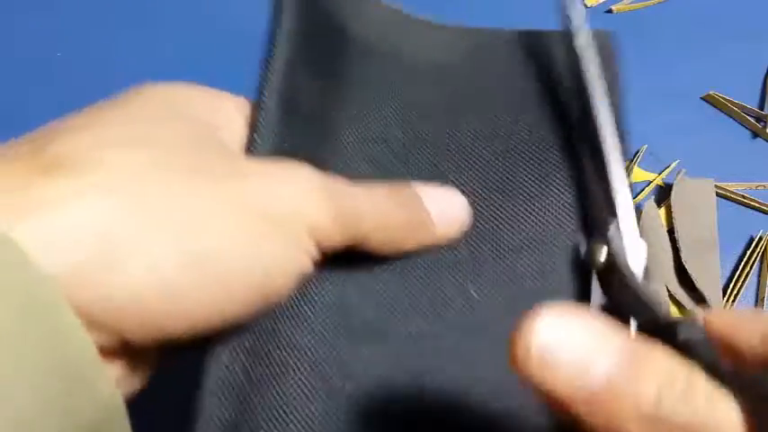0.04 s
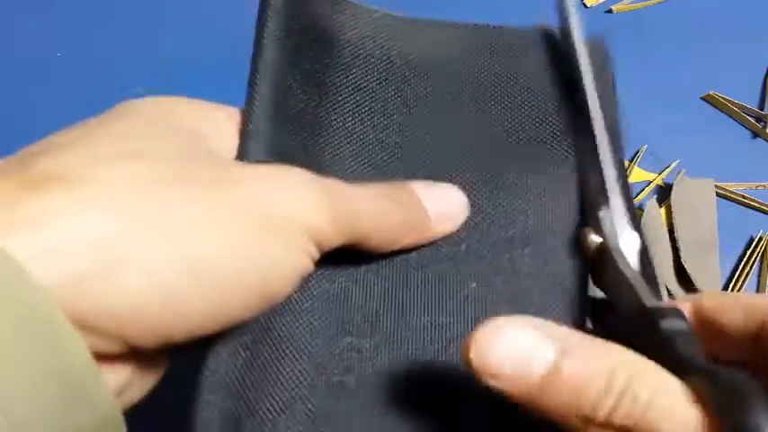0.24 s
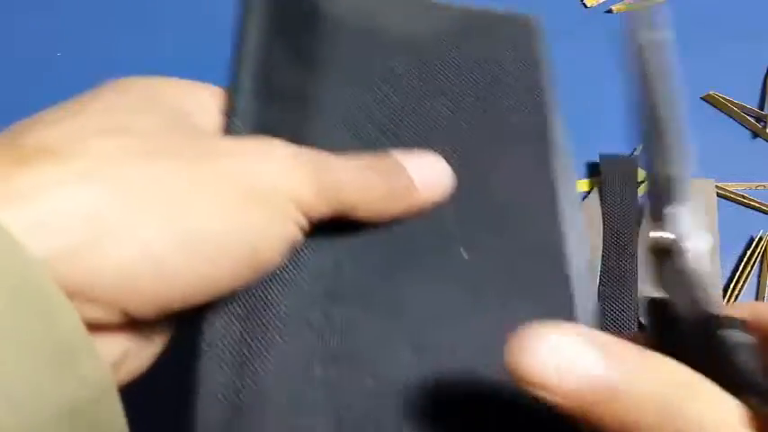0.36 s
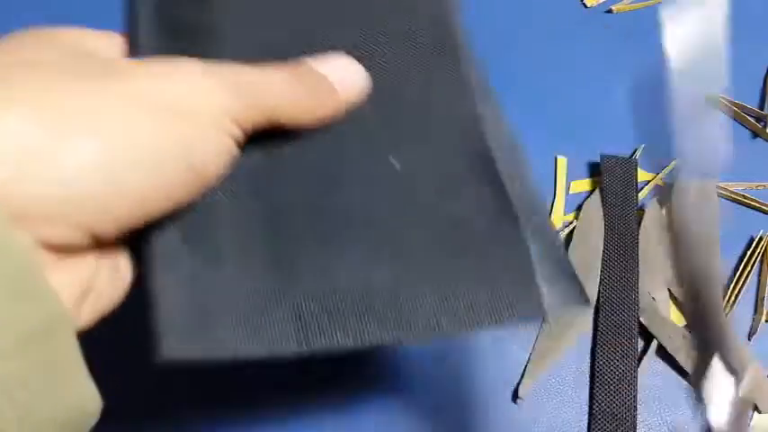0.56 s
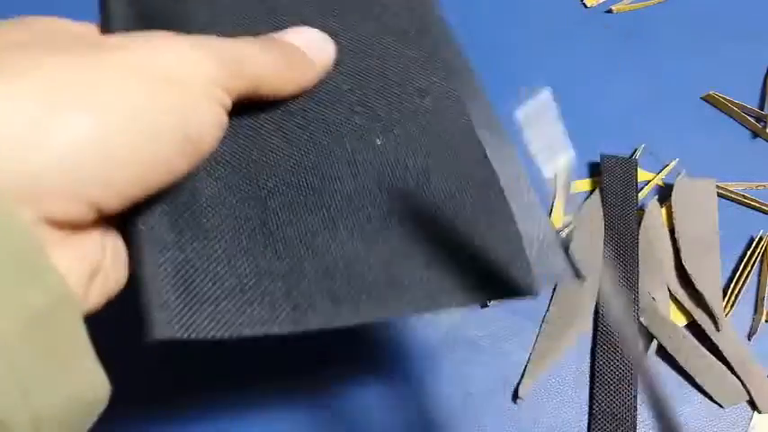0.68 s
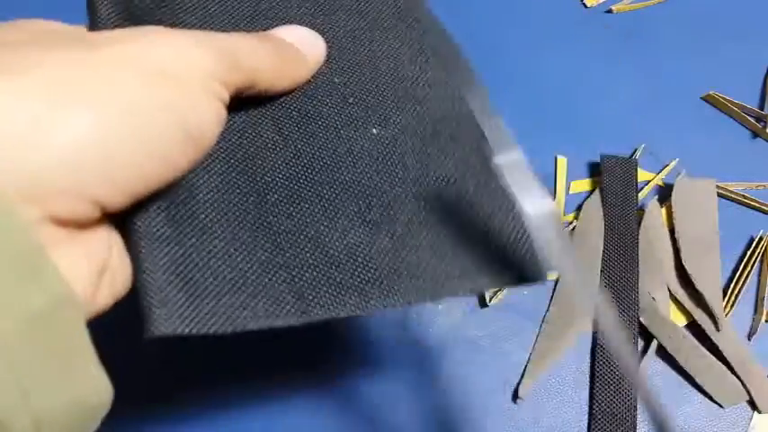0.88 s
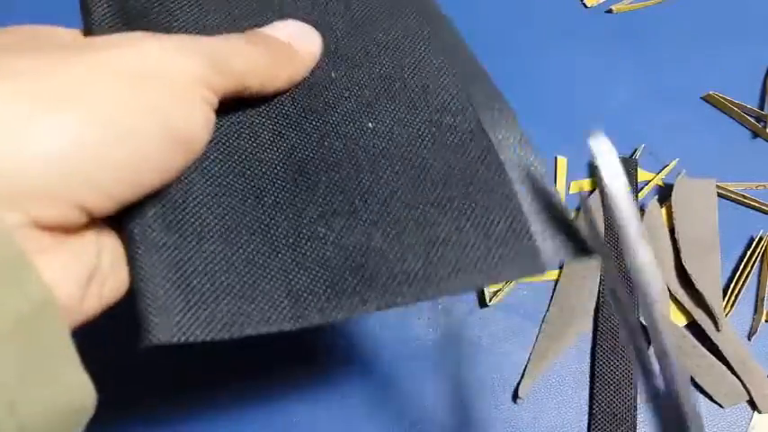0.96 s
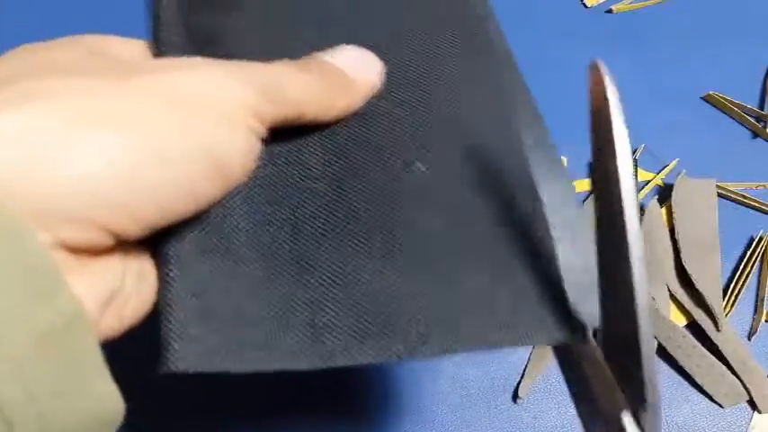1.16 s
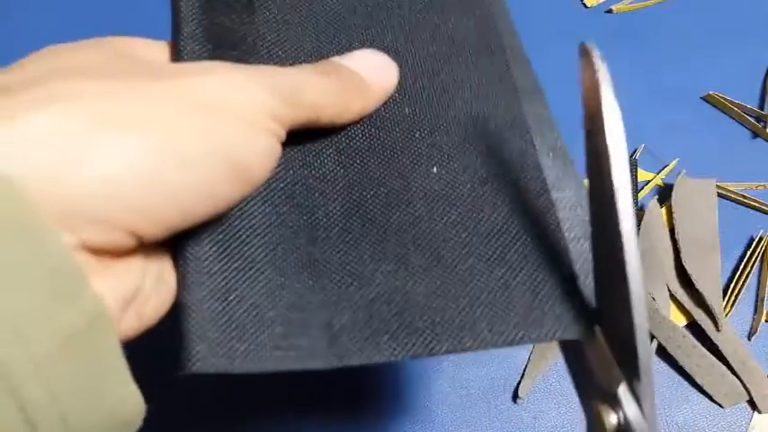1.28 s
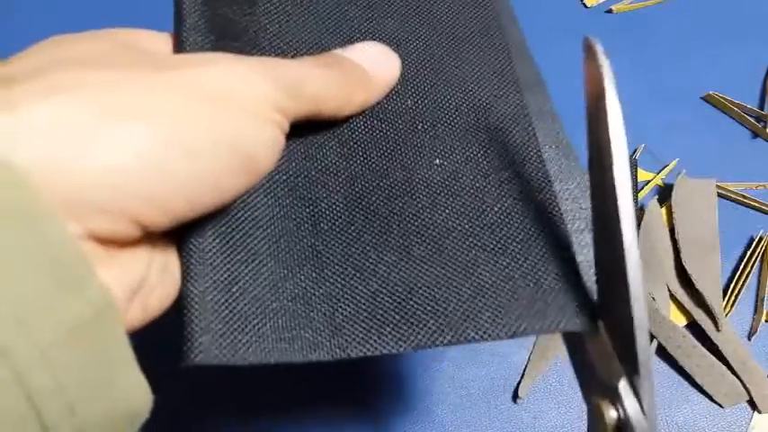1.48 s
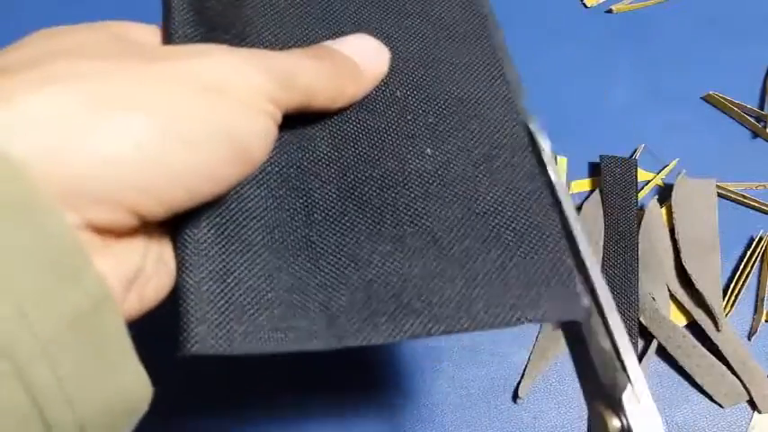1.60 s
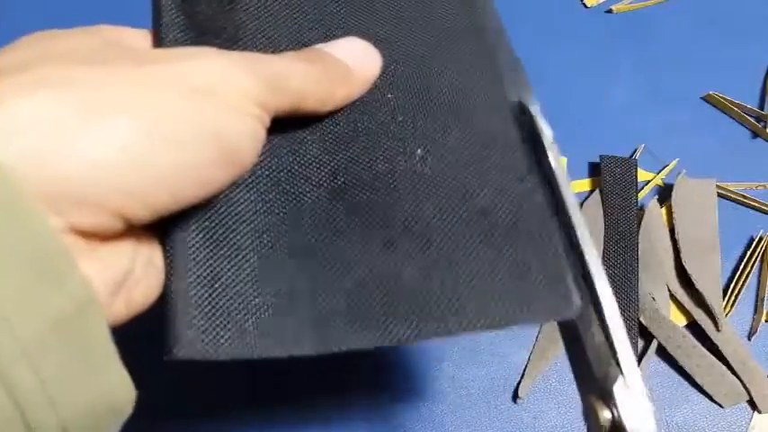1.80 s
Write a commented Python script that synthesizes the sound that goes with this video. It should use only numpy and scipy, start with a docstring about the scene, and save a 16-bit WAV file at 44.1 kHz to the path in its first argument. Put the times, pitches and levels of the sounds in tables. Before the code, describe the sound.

Scissors cut thick fabric twice, with crunchy snips, a steel clack and soft cloth rustles.

```python
"""Tailor's scissors cut thick woven fabric twice, close up and a little to the right, in a small quiet room.
The cloth rustles, then threads snap in a dense crunch and the blades shut with a steel clack.
The blades slide open and tick lightly while the cloth is shifted over the table.
In the second cut the pressed edges scrape and squeal upward until the thick last threads part.
The blades slide again and the sheet is let go with a soft flap."""
import sys
import numpy as np
from scipy import signal
from scipy.fft import rfft, irfft
from scipy.io import wavfile

SR = 44100
rng = np.random.default_rng(int(sys.argv[2]) if len(sys.argv) > 2 else 0)


def generate_wav(signal):
    """Clip the signal to [-1, 1] and save it as 16-bit WAV at the path in sys.argv[1]."""
    frames = np.transpose(np.atleast_2d(signal))
    scaled = np.clip(frames, -1, 1) * 32767
    pcm = np.round(scaled).astype(np.int16)
    wavfile.write(sys.argv[1], SR, pcm)


N = 81585


def amp(db):
    """Decibels to gain."""
    return 10 ** (np.asarray(db) / 20)


def unit(x):
    """Scales to rms 1."""
    return x / np.sqrt(np.mean(x ** 2) + 1e-20)


def clock():
    """Sample times in s."""
    return np.arange(N) / SR


def per_bin(points):
    """Interpolates a table onto the FFT bins, in log frequency."""
    f, value = np.transpose(points)
    return np.interp(np.log(np.fft.rfftfreq(N, 1 / SR) + 1), np.log(f + 1), value)


def colour(x, spectrum):
    """Filters x by a spectrum; rms 1."""
    return unit(irfft(rfft(x) * amp(per_bin(spectrum)), N))


def wobble(hz):
    """Noise low-passed at hz; rms 1."""
    rolloff = 1 + (np.fft.rfftfreq(N, 1 / SR) / hz) ** 4
    return unit(irfft(rfft(rng.standard_normal(N)) / rolloff, N))


def pan(db):
    """Stereo gains for a left minus right (L-R) level."""
    return amp(db * np.array([[.5], [-.5]]))


def stereo_noise(width=.48):
    """White noise, partly shared by left and right."""
    mid, side = rng.standard_normal((2, N))
    return np.array([mid + width * side, mid - width * side])


def grains(per_s, spread_db):
    """Stereo train of tiny clicks, a few of them large."""
    size = amp(spread_db * np.minimum(rng.exponential(1, N), 4))
    return size * (rng.random(N) < per_s / SR) * stereo_noise()


def stroke(at, db, rise, fall, round_s=.005):
    """Envelope that swells to a rounded peak and dies away."""
    t = clock() - at
    return amp(db - np.where(t < 0, rise, fall) * (np.hypot(t, round_s) - round_s))


def bursts(rows, spectrum):
    """Sudden bursts of coloured noise with exponential decay."""
    t = clock()
    level = sum(amp(db) * np.exp(-np.maximum(t - at, 0) / decay) * (t >= at) for at, db, decay in rows)
    return level * colour(stereo_noise(), spectrum)


def convolve(x, response):
    """Stereo convolution, scaled to unit energy in the left response."""
    return signal.fftconvolve(x, response / np.linalg.norm(response[0]), axes=1)[:, :N]


def blade_smear(x, t60_s=.022, ring_db=-5):
    """The many close modes of the blades smear each click."""
    t = clock()[:SR // 10]
    ring = rng.standard_normal((2, len(t))) * amp(-60 * t / t60_s)
    return x + amp(ring_db) * convolve(x, ring)


# Room floor and hand rumble spectra: f/Hz, level/dB
FLOOR_SPECTRUM = [(20, -9.5), (60, -14), (105, -0.5), (170, -12), (300, -15), (600, -17), (1500, -25),
                  (4000, -26), (7000, -19.5), (10700, -46.5)]
RUMBLE_SPECTRUM = [(20, -3), (70, -6), (103, 3), (160, -6.5), (250, -9), (450, -14), (1200, -44)]
# Hand rumble envelope: t/s, level/dB
HANDLING = [(0, -68), (.13, -90.5), (.3, -62.5), (.47, -72), (.75, -66.5), (.98, -63), (1.22, -63.5),
            (1.35, -76.5), (1.64, -58), (1.85, -76)]


def background(floor_db=-68.5):
    """Room floor and the rumble of moving hands."""
    floor = amp(floor_db) * colour(stereo_noise(), FLOOR_SPECTRUM)
    rumble_db = np.interp(clock(), *np.transpose(HANDLING))
    return floor + amp(rumble_db) * colour(stereo_noise(), RUMBLE_SPECTRUM)


# Cloth drags and sheet flaps: peak t/s, level/dB, rise/(dB/s), fall/(dB/s)
RUSTLES = [(.008, -44, 200, 305), (0.046, -47.5, 280, 574), (0.167, -63, 603, 492),
           (.33, -51.5, 911, 400.5), (0.701, -63.5, 57.5, 54), (0.967, -54, 415, 114),
           (1.02, -58.5, 190, 77.5), (1.231, -54, 493.5, 404), (1.666, -60, 316, 167)]
FLAPS = [(0.044, -58.5, 198, 600), (0.163, -62.5, 700, 503), (1.232, -61.5, 500, 500),
         (1.835, -64.5, 498.5, 200)]
# Their spectra: f/Hz, level/dB
RUSTLE_SPECTRUM = [(40, -15), (200, -14.5), (700, -0.5), (1500, -7), (2600, 2), (4000, -0.5), (6500, 3),
                   (8500, -6), (10700, -16.5)]
FLAP_SPECTRUM = [(40, -16.5), (110, 0.5), (260, -1), (450, -4.5), (750, 0), (1500, -7), (3000, -20.5),
                 (8000, -41)]


def cloth():
    """The weave rasps on fingers and steel; the sheet flaps when lifted and let go."""
    rub = grains(per_s=7000, spread_db=2.6) * amp(2.9 * wobble(91))
    rasp = colour(rub, RUSTLE_SPECTRUM) * np.sqrt(sum(stroke(*row) ** 2 for row in RUSTLES))
    flap = colour(grains(per_s=5400, spread_db=1.5), FLAP_SPECTRUM)
    return rasp + flap * sum(stroke(*row) for row in FLAPS)


# Snap envelopes, one list per cut: t/s, relative crisp level/dB, relative crunch level/dB
CUTS = [
    [(.176, -54.5, -59.5), (.182, -41.5, -51.5), (.192, -34, -41), (.199, -29, -32.5), (.211, -32, -39),
     (.217, -47.5, -57.5), (.224, -32, -45.5), (.228, -31, -51.5)],
    [(1.455, -53, -66.5), (1.467, -41.5, -52.5), (1.49, -38, -46.5), (1.514, -31.5, -40),
     (1.534, -31.5, -38), (1.552, -29, -35), (1.56, -28, -33.5), (1.572, -28, -35), (1.583, -26, -32.5),
     (1.588, -35.5, -41)],
]
# Treble and body spectra of snapping threads: f/Hz, level/dB
CRISP_SPECTRUM = [(500, -41), (1800, -25.5), (2800, -4.5), (4300, -1.5), (5200, 1), (6300, 4), (7600, 2.5),
                  (8600, -8), (10700, -4)]
CRUNCH_SPECTRUM = [(30, -28), (110, -9.5), (250, -9), (415, -5.5), (540, -5.5), (700, 0), (1050, -2),
                   (1280, -7), (1750, -6.5), (2600, -3), (6000, -41.5)]


def cutting(threads_per_s=580, clump_db=2.2, attack_db_per_s=6000, release_db_per_s=899):
    """Fibres snap in clumps as the edges pass thread after thread."""
    t, out = clock(), np.zeros((2, N))
    for cut in CUTS:
        times, crisp_db, crunch_db = np.transpose(cut)
        fade_db = attack_db_per_s * np.maximum(times[0] - t, 0)
        fade_db += release_db_per_s * np.maximum(t - times[-1], 0)
        threads_passed = np.cumsum(threads_per_s * (1 + .25 * wobble(150))) / SR
        clumps = amp(clump_db * np.cos(2 * np.pi * threads_passed))
        snaps = blade_smear(grains(per_s=14000, spread_db=1.8) * clumps)
        out += colour(snaps, CRISP_SPECTRUM) * amp(3.5 + np.interp(t, times, crisp_db) - fade_db)
        out += colour(snaps, CRUNCH_SPECTRUM) * amp(.5 + np.interp(t, times, crunch_db) - fade_db)
    return out


# Blade impact and bounces: t/s, level/dB, L-R/dB
CONTACTS = [(.2311, 1, -5), (0.2315, -5.5, -14), (0.2336, -11.5, -5), (0.237, -19.5, -5.5)]
# Blade modes: f/Hz, relative level/dB, t60/s
BLADE_MODES = [(7250, 0, .005), (6400, -14, .012), (4400, -18, .016), (2850, -17, .006), (1400, -15, .004),
               (850, -19, .005), (10600, -21, .009), (3548, -48, .12), (4328, -45, .14), (6455, -41, .2),
               (7020, -40, .16), (8027, -43, .15)]


def clack(crack_decay_s=.00089, crack_db=-7, detune=.0028):
    """The blades slam shut and bounce; each contact cracks and rings their modes."""
    out = np.zeros((2, N))
    for at, db, pan_db in CONTACTS:
        start = round(at * SR)
        t = clock()[:N - start]
        ring = np.zeros(len(t))
        for hz, mode_db, t60 in BLADE_MODES:
            hz *= 1 + detune * rng.standard_normal()
            ring += amp(mode_db - 60 * t / t60) * np.sin(2 * np.pi * hz * t)
        crack = stereo_noise()[:, :len(t)] * np.exp(-t / crack_decay_s)
        out[:, start:] += amp(db) * pan(pan_db) * (ring + amp(crack_db) * crack)
    return out


# Spectrum of ringing or sliding steel: f/Hz, level/dB
STEEL_SPECTRUM = [(400, -32.5), (1700, -21), (2900, -12), (3700, -12), (4400, -12.5), (5100, -9),
                  (6400, -1), (7400, -4), (8600, -11), (10700, -15)]


def shimmer(db=-27.5, t60_s=.17):
    """Many weak blade modes ring on after the clack."""
    return bursts([(CONTACTS[0][0], db, t60_s / np.log(1000))], STEEL_SPECTRUM)


def puff(at_s=.2313, decay_s=.0015, left_gain=.05):
    """A quick pull and slower push of air as the blades shut."""
    u = np.maximum(clock() - at_s, 0) / decay_s
    pressure = -2 * u * (1 - u + u ** 2 / 6) * np.exp(-u)
    return pressure * np.array([[left_gain], [1]])


# Low thuds: t/s, f/Hz, level/dB, t60/s, L-R/dB
THUDS = [(0.2314, 301.7, -16.5, 0.0098, -14.5), (0.2324, 130, -37, .07, -9.5), (0.327, 111, -41.5, 0.11, 0),
         (1.504, 107, -46.5, 0.15, -11)]


def thuds():
    """Damped low thuds: the thump of the blades shutting, then softer handling bumps."""
    out = np.zeros((2, N))
    for at, hz, db, t60, pan_db in THUDS:
        t = np.maximum(clock() - at, 0)
        out += pan(pan_db) * amp(db - 60 * t / t60) * np.sin(2 * np.pi * hz * t)
    return out


# Blade strokes: peak t/s, level/dB, rise/(dB/s), fall/(dB/s), relative body level/dB
SLIDES = [(.252, -32, 900, 288, -20.5), (0.429, -40, 531, 263, -20.5), (.605, -52, 152, 197, -19),
          (0.819, -58, 403, 121, -13), (1.2, -47, 204, 292, -15), (1.59, -35.5, 1500, 400, -13),
          (1.802, -32, 701, 385, -17)]


def sliding():
    """Fine friction of blade on blade, with some body from the cloth between them."""
    rub = blade_smear(grains(per_s=15000, spread_db=3) * amp(1.5 * wobble(200)))
    hiss = sum(stroke(at, db, rise, fall) for at, db, rise, fall, _ in SLIDES)
    body = sum(stroke(at, db + body_db, rise, fall) for at, db, rise, fall, body_db in SLIDES)
    return hiss * colour(rub, STEEL_SPECTRUM) + body * colour(rub, CRUNCH_SPECTRUM)


# Ticks: t/s, level/dB, decay/s
TICKS = [(.327, -43.5, 0.0039), (.7235, -52.5, 0.00092), (.884, -44, 0.00087), (1.025, -46.5, 0.0015),
         (1.1992, -26.5, 0.0032), (1.665, -50, .0012)]
# Tick spectrum: f/Hz, level/dB
TICK_SPECTRUM = [(300, -14.5), (2000, -18.5), (4700, -10.5), (5600, 0), (7000, -4), (8000, -2),
                 (9800, -7.5), (10700, -4)]


def ticks():
    """Light contacts of pivot and edges."""
    return bursts(TICKS, TICK_SPECTRUM)


# Low glides: t/s, length/s, start f/Hz, end f/Hz, level/dB
LOW_TONES = [(0.655, 0.098, 331, 237, -66), (0.781, 0.178, 267.7, 188, -65),
             (1.584, 0.11, 216.2, 229.6, -58.5)]


def low_tones(jitter=.0423):
    """Faint wavering glides while the cloth is moved."""
    out = np.zeros(N)
    for at, length, start_hz, end_hz, db in LOW_TONES:
        progress = np.clip((clock() - at) / length, 0, 1)
        hz = (start_hz + (end_hz - start_hz) * progress) * (1 + jitter * wobble(61))
        out += amp(db) * np.sin(np.pi * progress) * np.sin(2 * np.pi * np.cumsum(hz) / SR)
    return out


# Edge resonance, second cut: t/s, centre f/Hz, level/dB
SCRAPE = [(1.455, 5400, -51), (1.5, 6200, -38.5), (1.526, 7600, -33.5), (1.552, 8300, -29),
          (1.561, 7000, -42.5), (1.574, 6000, -23), (1.587, 5800, -44.5)]


def scrape(half_band_hz=980, width=.48):
    """Friction noise in a broad resonance that moves with the blades' crossing point."""
    t = clock()
    times, hz, db = np.transpose(SCRAPE)
    level = amp(np.interp(t, times, db)) * (t > times[0]) * (t < times[-1])
    phase = 2 * np.pi * np.cumsum(np.interp(t, times, hz)) / SR
    mid, side = (wobble(half_band_hz) * np.cos(phase) + wobble(half_band_hz) * np.sin(phase)
                 for _ in range(2))
    return level * unit(np.array([mid + width * side, mid - width * side]))


# Edge squeal, second cut: t/s, f/Hz, level/dB
SQUEAL = [(1.464, 5600, -59.5), (1.467, 5650, -34), (1.479, 5850, -45), (1.484, 5950, -36),
          (1.501, 6300, -34.5), (1.508, 6650, -26.5), (1.513, 7150, -19.5), (1.517, 7500, -35),
          (1.521, 7790, -24.5), (1.532, 7950, -32), (1.545, 8220, -44)]


def squeal(jitter=.02, flutter_db=2, low_mode_hz=3040, low_mode_db=-13.5):
    """Stick-slip climbs in pitch as the crossing nears the tips; hard pressure adds a lower mode."""
    t = clock()
    times, hz, db = np.transpose(SQUEAL)
    level = amp(np.interp(t, times, db)) * (t > times[0]) * (t < times[-1])
    turns = np.cumsum(np.interp(t, times, hz) * (1 + jitter * wobble(790))) / SR
    tone = unit(np.sin(2 * np.pi * turns) * amp(flutter_db * wobble(476)))
    low_mode = unit(np.sin(2 * np.pi * low_mode_hz * t + wobble(446)))
    return level * (tone + amp(low_mode_db) * low_mode * level / level.max())


# Final snaps: t/s, level/dB, decay/s
LAST_THREADS = [(1.5735, -20.5, 0.0011), (1.5806, -11.5, 0.00065), (1.5854, -19, 0.00041)]


def last_threads(body_db=-9.5):
    """Thick threads part one by one at the end of the second cut."""
    return bursts(LAST_THREADS, CRISP_SPECTRUM) + amp(body_db) * bursts(LAST_THREADS, CRUNCH_SPECTRUM)


# Microphone balance: f/Hz, L-R/dB
BALANCE = [(60, -3), (300, 1.5), (1000, -1.5), (3000, -2), (5800, -3.5), (7200, -8), (10300, -6)]
# Phase lead of the left microphone: f/Hz, lead/rad
LEFT_LEAD = [(0, -3.5), (5500, 1.5), (6400, 1.26), (6900, -1.87), (8200, -2), (9000, -0.6), (10400, 1.5)]


def microphones(x):
    """The scissors are nearer the right microphone; the sound reaches the pair out of step."""
    phase = np.array([[.5], [-.5]]) * per_bin(LEFT_LEAD)
    return irfft(rfft(x) * pan(per_bin(BALANCE)) * np.exp(1j * phase), N)


def room(x, t60_s=.11, db=-16, gap_s=.003):
    """A short tail of sparse reflections."""
    t = clock()[:SR // 2]
    taps = rng.standard_normal((2, len(t))) * (rng.random((2, len(t))) < .1)
    return amp(db) * convolve(x, taps * amp(-60 * t / t60_s) * (t > gap_s))


def scene():
    """Cloth and scissors with their reflections, plus the dry low sounds and room floor."""
    sources = cloth() + cutting() + shimmer() + sliding() + ticks() + scrape() + squeal() + last_threads()
    near = microphones(sources) + clack()
    return background() + near + room(near) + puff() + thuds() + low_tones()


def record(dry):
    """The clack overloads the input; a low-pass limits the band."""
    clipped = np.clip(dry, -.92, .92)
    lowpass = signal.firwin(401, cutoff=10950, window=("kaiser", 8), fs=SR)
    return signal.oaconvolve(clipped, lowpass[None], "same")


dry = scene()
out = record(dry)
generate_wav(out)
```